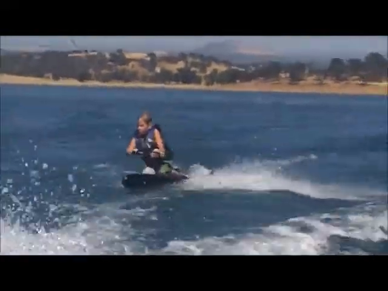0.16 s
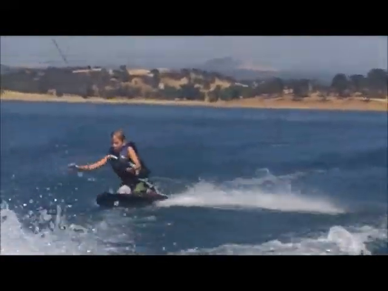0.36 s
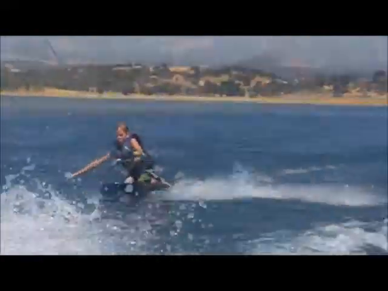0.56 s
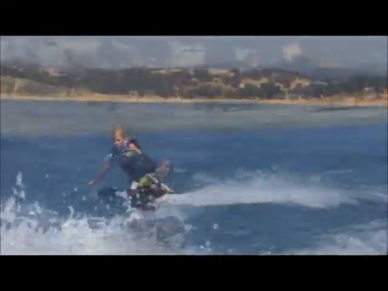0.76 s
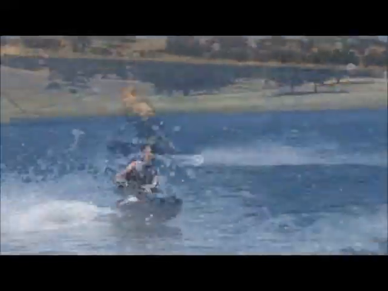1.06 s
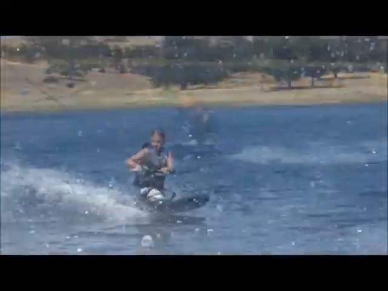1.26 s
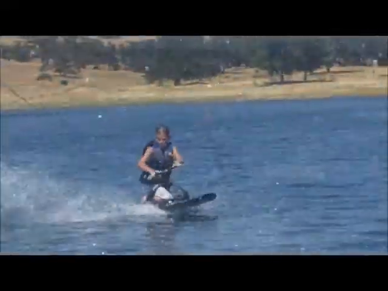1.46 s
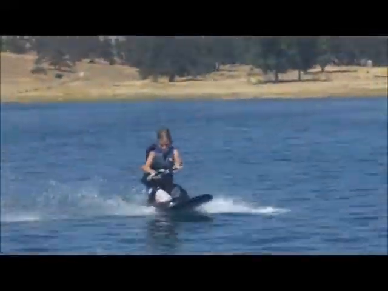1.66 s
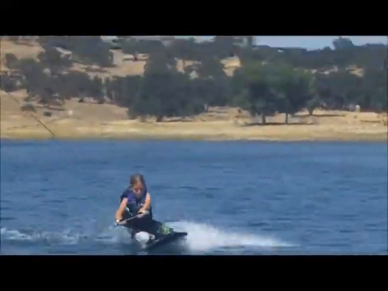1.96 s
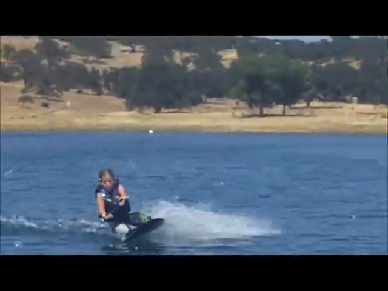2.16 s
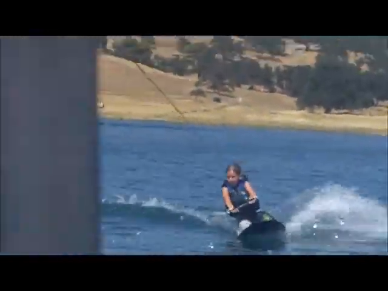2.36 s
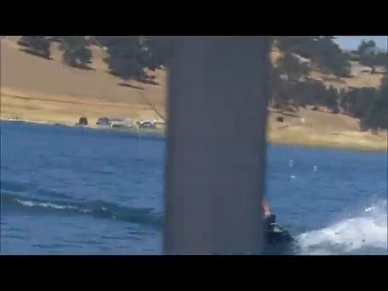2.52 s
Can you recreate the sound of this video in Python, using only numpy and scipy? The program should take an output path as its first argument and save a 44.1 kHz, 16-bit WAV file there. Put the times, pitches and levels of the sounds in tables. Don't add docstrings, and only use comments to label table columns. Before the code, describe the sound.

Close, nearly mono sound from a boat's stern on an open lake: constant deep engine hum, hissing spray and churning wash, rumbling wind gusts, a beating overlap in the middle, then a few water slaps.

```python
import sys
import numpy as np
from scipy import signal
from scipy.fft import rfft, irfft, next_fast_len
from scipy.io import wavfile
from scipy.ndimage import uniform_filter1d, map_coordinates

SR = 44100
rng = np.random.default_rng(int(sys.argv[2]) if len(sys.argv) > 2 else 0)


def generate_wav(signal):
    frames = np.transpose(np.atleast_2d(signal))
    scaled = np.clip(frames, -1, 1) * 32767
    pcm = np.round(scaled).astype(np.int16)
    wavfile.write(sys.argv[1], SR, pcm)


def volts_from_decibels(level):
    exponent = np.asarray(level, float) / 20
    return 10 ** exponent


N = 118629


def unit(x):
    return x / np.sqrt(np.mean(x ** 2) + 1e-20)


def along(points, hz):
    freq, value = np.transpose(points)
    return np.interp(np.log(hz + 1), np.log(freq + 1), value)


def curve(points):
    time, value = np.transpose(points)
    return np.interp(np.arange(N) / SR, time, value)


def wobble(rate_hz):
    knots = rng.standard_normal(int(N * rate_hz / SR) + 4)
    return map_coordinates(knots, [np.arange(N) * rate_hz / SR])


def filtered(x, response):
    size = next_fast_len(N + SR // 2)
    spectrum = rfft(x, size) * response(np.fft.rfftfreq(size, 1 / SR))
    return irfft(spectrum, size)[..., :N]


def rush(spectrum, patchy_db, source=None):
    if source is None:
        source = rng.standard_normal(N)
    z = signal.stft(source, nperseg=512)[2]
    patches = uniform_filter1d(rng.standard_normal(z.shape), size=8, axis=0)
    patches = uniform_filter1d(patches, size=10, axis=1)
    x = signal.istft(z * volts_from_decibels(patchy_db * unit(patches)), nperseg=512)[1][:N]
    return unit(filtered(x, lambda hz: volts_from_decibels(along(spectrum, hz))))


# time_s, speed_hz
FIRST_SPEED = [(0, 17.3), (1.74, 17.31)]
SECOND_SPEED = [(0, 16.54), (1.5, 16.54), (2.1, 16.63), (2.69, 16.58)]
# order, first_shot_db, second_shot_db (rms)
ENGINE_ORDERS = [(4, -36, -35), (5, -35, -36), (6, -26.5, -29), (7, -44, -46), (8, -30, -29.5),
                 (9, -36, -35.5), (10, -36, -33.5), (11, -44, -42), (12, -49, -48), (13, -39, -37.5),
                 (14, -42, -42), (15, -43, -44), (16, -41, -36.5), (17, -51, -51), (18, -55, -52),
                 (19, -53, -53), (20, -55, -49), (21, -58, -56), (23, -51, -60), (24, -55, -49),
                 (28, -58, -58), (32, -60, -58), (36, -60, -55), (39, -60, -53)]
# time_s, level_db
FIRST_BOOM = [(0, -1), (.3, -1.5), (1.3, -1), (1.6, 0), (1.74, -10)]
SECOND_BOOM = [(.3, 3), (.9, 1.5), (1.15, 6.5), (1.35, -3), (1.6, 6), (1.9, -3), (2.69, -0.5)]
UNSTEADY_DB = .8
BOOM_ORDER = 6


def engine(speed, boom, lead_cycles, column, phases, gain_db):
    angle = 2 * np.pi * (np.cumsum(curve(speed)) / SR + lead_cycles)
    total = 0
    for row, phase in zip(ENGINE_ORDERS, phases):
        order = round(row[0])
        level_db = row[column] + UNSTEADY_DB * wobble(4.05)
        if order == BOOM_ORDER:
            level_db = level_db + curve(boom)
        total = total + volts_from_decibels(level_db) * np.sin(order * angle + phase)
    return volts_from_decibels(gain_db) * np.sqrt(2) * total


# time_s, level_db
FIRST_SPRAY = [(0, -39.5), (.08, -42.5), (.14, -41.5), (.19, -45), (.23, -42.5), (1, -42.5), (1.74, -44)]
SECOND_SPRAY = [(0.26, -36.5), (0.43, -40.5), (0.55, -37), (0.65, -38.5), (0.76, -34.5), (0.8, -39.5),
                (1.09, -37.5), (1.15, -40.5), (1.54, -35.5), (1.69, -38), (1.88, -37), (1.91, -41.5),
                (2.15, -38), (2.28, -38.5), (2.33, -33.5), (2.34, -37), (2.62, -39), (2.69, -37.5)]
# time_s, level_db
WAKE_SWELLS = [(0, -36.5), (.12, -35.5), (.22, -37.5), (.34, -36), (.46, -38.5), (.72, -34.5), (.82, -38),
               (1.04, -35), (1.28, -38), (1.4, -36), (1.56, -33.5), (1.64, -36), (1.82, -37.5), (1.87, -33),
               (1.9, -36.5), (1.93, -39), (2.35, -35), (2.69, -36.5)]
# freq_hz, density_db (per Hz)
SPRAY_COLOUR = [(700, -30), (1200, -3.5), (2000, -2.5), (4000, -7), (7000, -3.5), (9500, -16.5),
                (12500, -30), (15000, -58)]
WASH_COLOUR = [(40, -12), (120, -4), (260, -8), (420, -13), (650, -13.5), (1000, -15), (1500, -25.5),
               (3000, -53.5)]


def water(spray_db, wash_db):
    droplet_db = 0.75 * wobble(900) + 0.75 * wobble(39.87)
    drops = rng.standard_normal(N) * volts_from_decibels(droplet_db)
    spray = volts_from_decibels(spray_db + 0.47 * wobble(9.24)) * rush(SPRAY_COLOUR, patchy_db=0.58, source=drops)
    swell_db = curve(WAKE_SWELLS) + wash_db + 0.73 * wobble(11.74)
    return spray + volts_from_decibels(swell_db) * rush(WASH_COLOUR, patchy_db=0.6)


# time_s, level_db
WIND_GUSTS = [(0.0, -26), (0.05, -12), (0.34, -24.5), (0.38, -14.5), (0.7, -23), (0.99, -17), (1.03, -20),
              (1.08, -15.5), (1.26, -20), (1.29, -13), (1.46, -24), (1.57, -17.5), (2.26, -19), (2.29, -21),
              (2.33, -13.5), (2.4, -22), (2.42, -18.5), (2.69, -16.5)]
# freq_hz, density_db (per Hz)
WIND_RUMBLE = [(1.5, -13), (5, -7), (15, -4), (35, -12), (60, -18.5), (90, -32), (200, -39), (400, -88)]


def wind():
    lumps = volts_from_decibels(0.53 * wobble(8.93)) * rush(WIND_RUMBLE, patchy_db=-2.46)
    return volts_from_decibels(curve(WIND_GUSTS) - 3) * unit(lumps)


# time_s, peak_db, width_s, sign
HULL_SLAPS = [
    (.198, -20, .0005, 1),
    (1.3, -8, 0.0038, 1),
    (1.552, -11, 0.0011, -1),
    (1.869, -5, 0.0019, 1),
    (1.875, -11.5, 0.00086, -1),
    (1.883, -25, 0.0014, 1),
    (1.887, -18, .0005, 1),
    (1.89, -9, 0.00071, 1),
    (2.331, -16, .008, 1),
]


def slaps():
    t = np.arange(N) / SR
    total = np.zeros(N)
    for time, peak_db, width, sign in HULL_SLAPS:
        total += np.sign(sign) * volts_from_decibels(peak_db) * np.exp(-np.abs((t - time) / width) ** 1.87)
    return total


NOTCH_HZ, NOTCH_WIDTH_HZ, NOTCH_DEPTH_DB = 5418, 1700, -37
TOP_HZ = 14950
CEILING = .6
OFFSET = -.016
SETTLE_S = .02


def housing(hz):
    stiffness = NOTCH_HZ ** 2 - hz * hz
    damping = 1j * hz * NOTCH_WIDTH_HZ
    return (hz < TOP_HZ) * (stiffness + damping * volts_from_decibels(NOTCH_DEPTH_DB)) / (stiffness + damping)


def shot(sound, cut_s, step, after):
    overloaded = sound / (1 + np.abs(sound / CEILING) ** 4) ** 0.24
    x = filtered(overloaded, housing) + OFFSET
    t = np.arange(N) / SR - cut_s
    x = x + (step - x[round(cut_s * SR)]) * np.exp(-(t / SETTLE_S) ** 2)
    return x * ((t >= 0) if after else (t < 0))


CUT_IN_S, CUT_OUT_S = .23820, 1.73972
STEP_IN, STEP_OUT = -.04, -.065
LEAD_CYCLES = -.046
TURNED_ORDER = 10
GAIN_SHARE = .4
FIRST_WASH_DB, SECOND_WASH_DB = 1, 2.5


def scene():
    phases = rng.uniform(0, 2 * np.pi, len(ENGINE_ORDERS))
    turned = phases + np.pi * (np.transpose(ENGINE_ORDERS)[0] == TURNED_ORDER)
    spray_1, spray_2 = curve(FIRST_SPRAY), curve(SECOND_SPRAY)
    gain_1 = GAIN_SHARE * (spray_1 - spray_1.mean())
    gain_2 = GAIN_SHARE * (spray_2 - spray_2.mean())

    first = engine(FIRST_SPEED, FIRST_BOOM, LEAD_CYCLES, 1, turned, gain_1)
    first = first + water(spray_1, FIRST_WASH_DB) + wind()
    second = engine(SECOND_SPEED, SECOND_BOOM, 0, 2, phases, gain_2)
    second = second + water(spray_2, SECOND_WASH_DB) + wind() + slaps()

    mono = shot(first, CUT_OUT_S, STEP_OUT, after=False)
    mono = mono + shot(second, CUT_IN_S, STEP_IN, after=True)
    return np.array([mono, mono])


# freq_hz, side_under_mid_db
CHANNELS_APART = [(40, -18), (200, -36.5), (700, -26.5), (2400, -24.5), (5000, -21), (9000, -25),
                  (15000, -12)]


def channel_slips(mono):
    hz, t, z = signal.stft(mono, SR, nperseg=2048)
    band = (np.sqrt(hz) / 6).astype(int)
    slipping_bands = (rng.random((band[-1] + 1, len(t))) < .2)[band]
    slips = slipping_bands * (rng.random(len(t)) < .3)
    level = volts_from_decibels(along(CHANNELS_APART, hz))[:, None]
    z = z * slips * level * np.exp(2j * np.pi * rng.random(z.shape))
    return signal.istft(z, SR, nperseg=2048)[1][:N]


def roll_off(x):
    return signal.sosfilt(signal.butter(12, 15550, fs=SR, output="sos"), x)


def record(dry):
    side = channel_slips(dry[0]) - .0125
    return roll_off(dry + [side, -side])


dry = scene()
out = record(dry)
generate_wav(out)
```